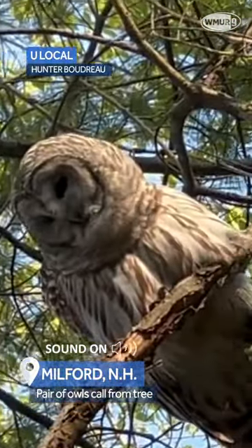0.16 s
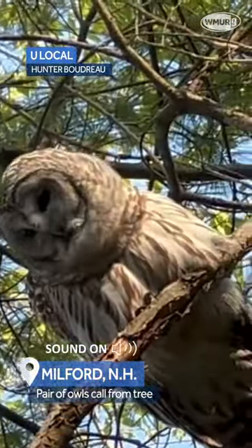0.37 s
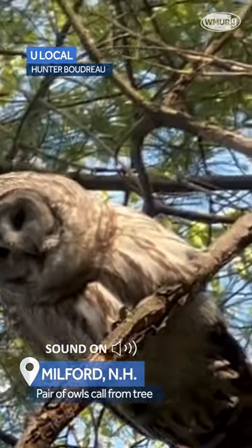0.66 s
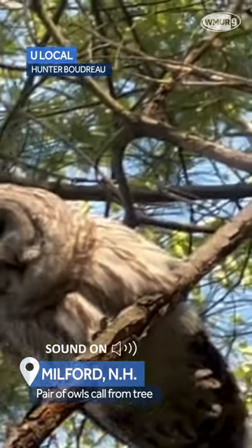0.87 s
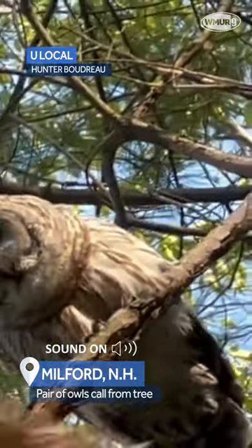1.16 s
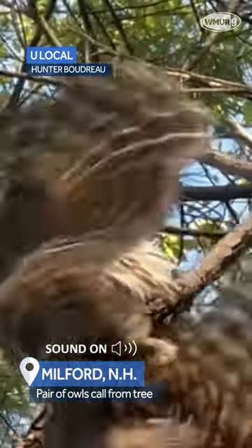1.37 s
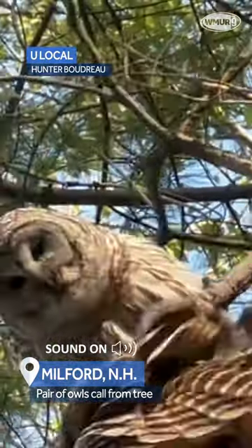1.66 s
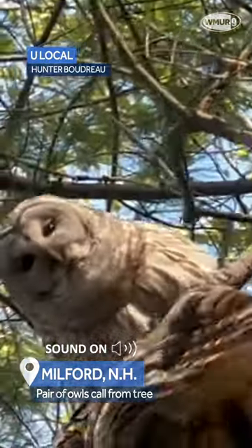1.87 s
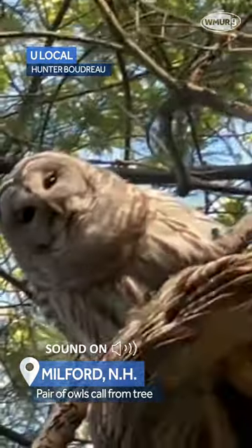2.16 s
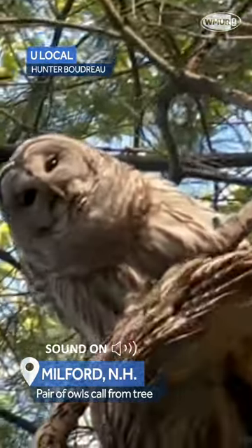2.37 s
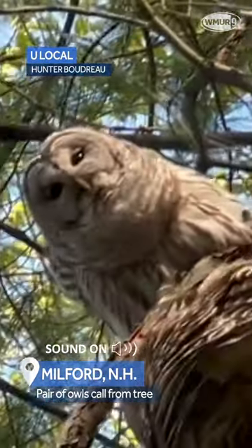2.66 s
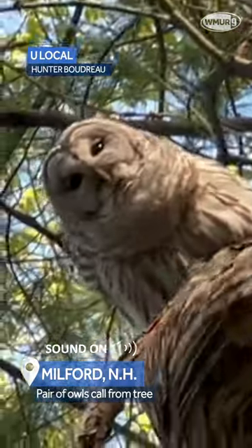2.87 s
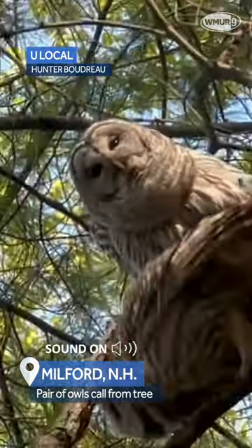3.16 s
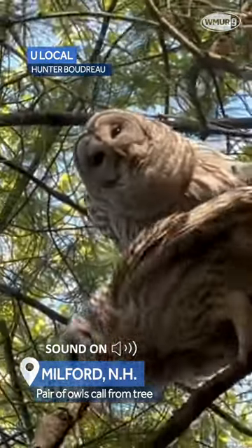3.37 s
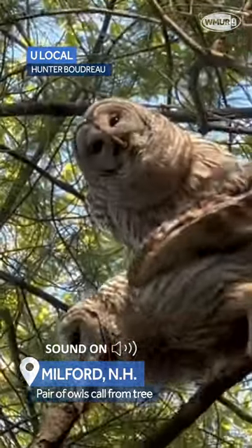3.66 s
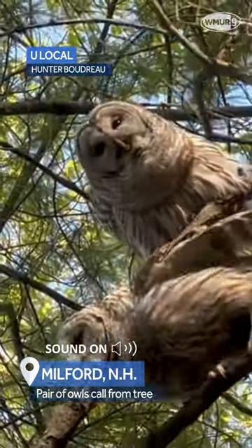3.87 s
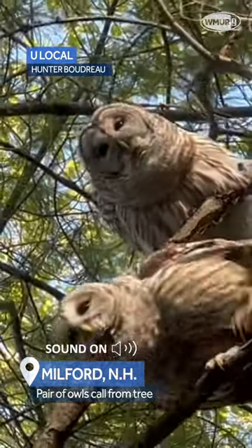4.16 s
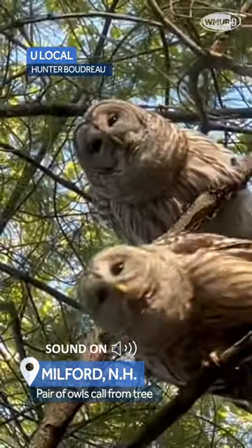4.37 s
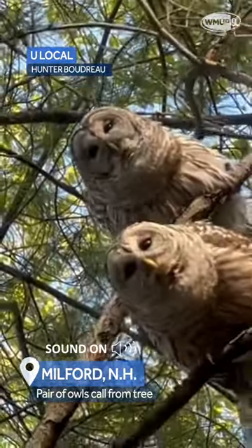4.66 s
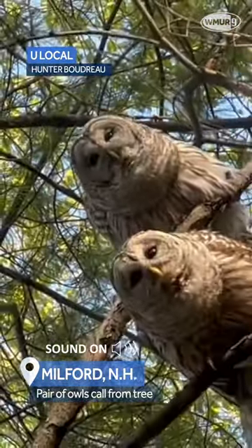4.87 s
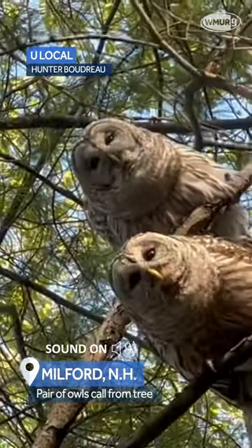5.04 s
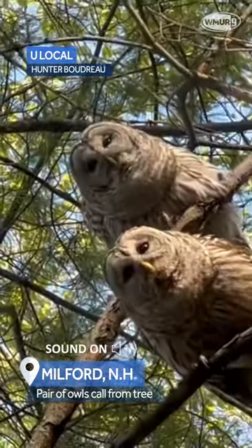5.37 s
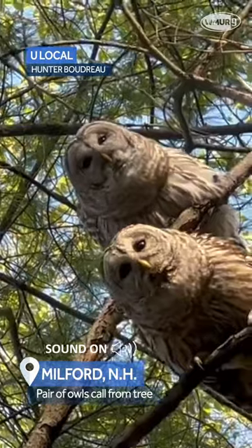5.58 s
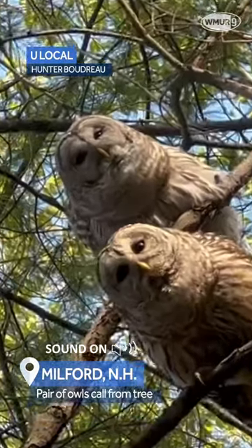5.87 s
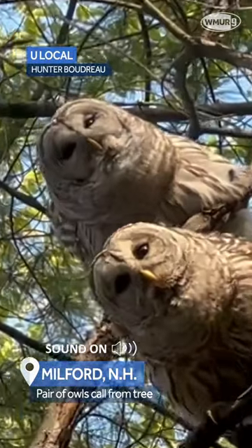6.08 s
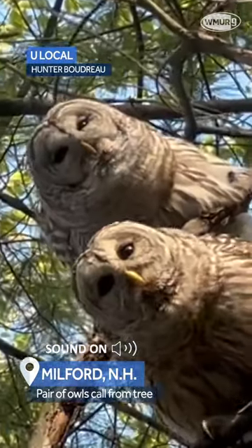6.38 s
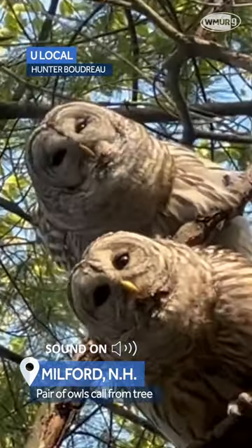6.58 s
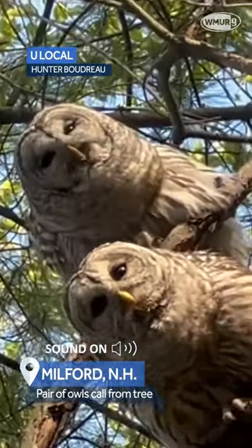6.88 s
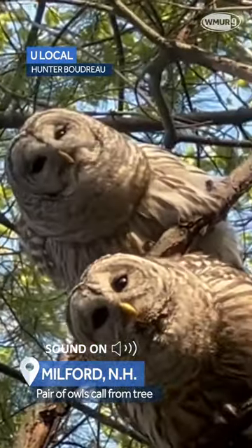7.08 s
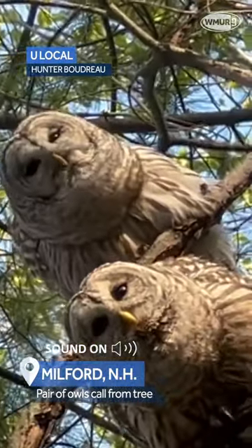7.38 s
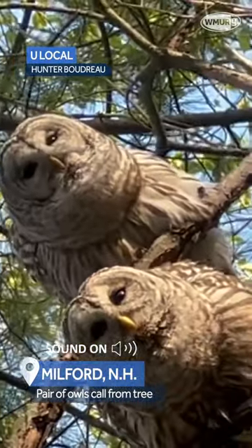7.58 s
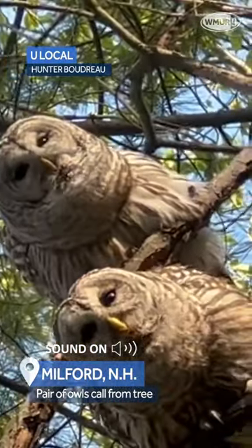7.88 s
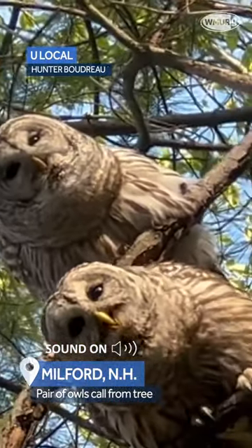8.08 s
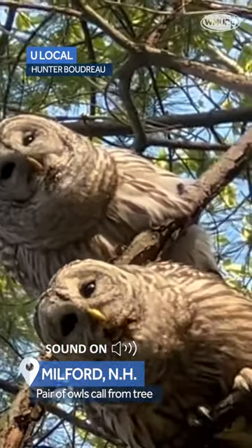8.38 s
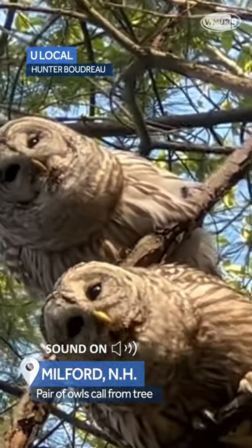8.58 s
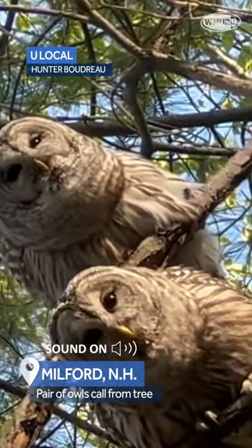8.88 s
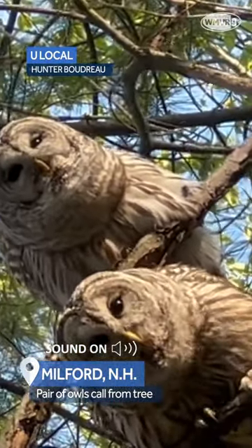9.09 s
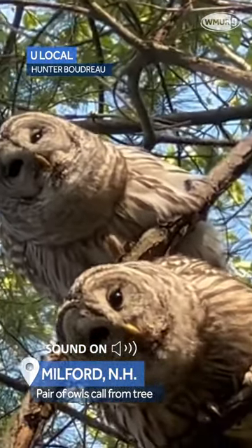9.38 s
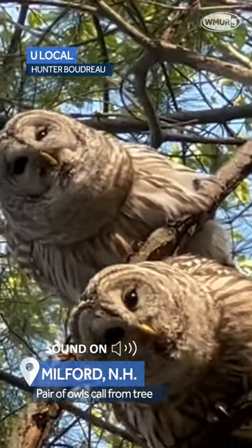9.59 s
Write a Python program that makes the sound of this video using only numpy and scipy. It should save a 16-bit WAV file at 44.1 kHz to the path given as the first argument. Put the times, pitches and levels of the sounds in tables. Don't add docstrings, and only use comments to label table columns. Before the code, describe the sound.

Two barred owls duet close by outdoors, hoarse low hoots quickening against clear higher notes, with buzzing groans and long trilled falling calls over faint traffic.

```python
import sys
import numpy as np
from scipy import signal
from scipy.fft import rfft, irfft, next_fast_len
from scipy.io import wavfile
from scipy.ndimage import uniform_filter1d

SR = 44100
rng = np.random.default_rng(int(sys.argv[2]) if len(sys.argv) > 2 else 0)


def materialize(psi):
    bounded = np.clip(np.atleast_2d(psi).T, -1, 1)
    quanta = np.round(bounded * 32767).astype(np.int16)
    wavfile.write(sys.argv[1], SR, quanta)


def gain_from_decibels(decibels):
    exponent = np.asarray(decibels, float) / 20
    return 10 ** exponent


N = 428652
TIME = np.arange(N) / SR
HZ = np.fft.rfftfreq(next_fast_len(N + SR // 2), 1 / SR)
SIZE = 2 * (len(HZ) - 1)


def shape_db(table, hz):
    f, db = np.transpose(table)
    return np.interp(np.log(hz + 1), np.log(f), db)


def level(x, db):
    return x * gain_from_decibels(db) / np.sqrt(np.mean(x ** 2))


def walk(rate, size):
    k = max(int(SR / rate), 1)
    steps = np.repeat(rng.standard_normal(size // k + 1), k)
    return 1.72 * uniform_filter1d(uniform_filter1d(steps, k), k)[:size]


def band(x, hz, octaves):
    f = np.fft.rfftfreq(len(x), 1 / SR) + 1
    bell = np.exp(-(np.log2(f / hz) / octaves) ** 2)
    return irfft(rfft(x) * bell, len(x))


def add(track, x, s):
    i = int(s * SR)
    track[i:i + len(x)] += x[:N - i]


def syrinx(hz, gain, tilt_db, even_db, jitter, breath_db, patchy_db):
    size = len(hz)
    phase = 2 * np.pi * np.cumsum(hz * (1 + jitter * walk(150, size))) / SR
    k = np.arange(1, 21)[:, None]
    tight = np.log2(hz / 250)
    db = -tilt_db * np.log2(k) - 1.63 * tight * (k > 1)
    db = db + even_db * np.clip(tight - .6, 0, 2) * (k == 2)
    effort_db = 20 * np.log10(gain / 0.19 + .001)
    db = db + 1.13 * effort_db * np.clip((k * hz - 3300) / 1800, 0, 1)
    flicker = np.array([walk(35, size) for _ in k])
    db = db + patchy_db * flicker * np.where(k > 1, 1, .25)
    tones = np.sum(gain_from_decibels(db) * (k * hz < 12000) * np.cos(k * phase), axis=0)
    air = uniform_filter1d(rng.standard_normal(size), size=14) * (1 + np.cos(phase))
    return gain * (tones + gain_from_decibels(breath_db - 6.8 * tight) * air)


def hoots(table, release_s, release_share, climb_share, edge, swell, release, tilt_db, glide_db, **voice):
    track = np.zeros(N)
    for s, length, hz, db, *thin_db in table:
        fall = release_s + release_share * length
        rise = (length - fall) * climb_share
        t = np.arange(int(length * SR)) / SR
        up = np.sin(np.pi / 2 * np.clip(t / rise, 0, 1))
        down = np.sin(np.pi / 2 * np.clip((t[-1] - t) / fall, 0, 1))
        pitch = hz * (edge + (1 - edge) * up * down)
        sag_db = sum(thin_db) * (up * down) ** 6
        gain = gain_from_decibels(db - sag_db) * up ** swell * down ** release
        dull_db = tilt_db - 0.19 * sag_db + glide_db * np.sqrt(1 - up) + glide_db / 2 * (1 - down)
        add(track, syrinx(pitch, gain, dull_db, **voice), s)
    return track


def long_calls(calls, trills, trill_depth, tilt_db, tilt_per_db, tilt_per_oct, **voice):
    track = np.zeros(N)
    for rows, (crest, rate_hz) in zip(calls, trills):
        s, *columns = np.transpose(rows)
        t = np.arange(s[0], s[-1], 1 / SR)
        hz, db = (np.interp(t, s, c) for c in columns)
        depth = trill_depth * np.clip((t - crest + 0.16) / 0.29, 0, 1)
        trill = depth * np.cos(2 * np.pi * rate_hz * (t - crest))
        since, left = t - s[0], s[-1] - t
        fade = np.clip(np.minimum(since, left) / 0.026, 0, 1)
        dull_db = tilt_db + tilt_per_db * (db + 26.5) + tilt_per_oct * np.log2(hz / 450)
        dull_db += 6 * np.clip(1 - since / .07, 0, 1) ** .5
        dull_db += 6 * np.clip(1 - left / .13, 0, 1) ** .5
        add(track, syrinx(hz * (1 + trill), fade * gain_from_decibels(db + 21 * trill), dull_db, **voice), s[0])
    return track


# start in seconds, length in seconds, top pitch in Hz, level in dB.
LOW_HOOTS = [(.02, 0.082, 180, -49), (.18, .18, 165.4, -59), (.48, .12, 208, -40.5),
             (.885, .09, 278, -31.5), (1.275, 0.1, 353.7, -28), (1.665, .12, 432.4, -31),
             (2.03, .125, 480, -28), (2.395, 0.12, 484, -25.5), (2.765, .135, 495.5, -25),
             (4.04, .09, 399.7, -32), (4.27, .08, 323, -34), (4.755, .13, 383.3, -25.5),
             (5.165, .128, 458, -24.5), (5.565, 0.12, 481.7, -25.5), (5.955, .137, 480, -22.5),
             (7.4, .123, 341, -35), (7.63, 0.16, 287.1, -31.5), (8.11, .107, 329.9, -29),
             (8.4, 0.083, 286.4, -39), (8.525, .128, 378.7, -33.5), (8.895, .135, 400, -25),
             (9.3, .126, 422.4, -27.5), (9.685, .135, 400, -29)]
# start in seconds, length in seconds, pitch factor, level in dB.
GROANS = [
    (2.954, .44, 1.01, 0),
    (6.16, .4, .985, 2.5),
]
# time as a share of its length, pitch in Hz, effort in dB.
GROAN_COURSE = [
    (0, 205.4, -15.5),
    (.07, 352.4, -31),
    (.16, 468.6, -25),
    (0.319, 474.4, -32.5),
    (0.441, 420, -27.5),
    (.56, 340.8, -27),
    (.68, 266, -36.5),
    (0.846, 201.5, -28.5),
    (0.999, 168.3, -44.5),
]


def low_owl():
    voice = hoots(LOW_HOOTS, release_s=.002, release_share=.44, climb_share=.92, edge=.34, swell=.5, release=0.36,
                  tilt_db=8, glide_db=1.5, even_db=-2, jitter=.018, breath_db=0, patchy_db=4)
    groans = [np.array(GROAN_COURSE) * (length, factor, 1) + (s, 0, db) for s, length, factor, db in GROANS]
    untrilled = [(0, 0)] * len(groans)
    return voice + long_calls(groans, untrilled, trill_depth=0, tilt_db=9.5, tilt_per_db=0.0833, tilt_per_oct=2.7,
                              even_db=11.5, jitter=0.0068, breath_db=-4.0, patchy_db=0.0)


# start in seconds, length in seconds, top pitch in Hz, level in dB,
# thinning between the forceful ends in dB.
HIGH_HOOTS = [(1.8, 0.13, 583, -65, 3), (1.89, .2, 592, -58.5, -5), (2.1, 0.077, 604, -47.5, -1),
              (3.14, 0.15, 612.5, -32.5, 0), (3.503, .14, 641.6, -28.5, 1), (3.826, .14, 665, -27, 5),
              (5.46, 0.46, 648.3, -31.5, 17), (6.025, .16, 625, -38, -0.5), (6.38, .4, 635.7, -40, -5.5),
              (8.5, .342, 635, -32.5, 10), (9.33, 0.24, 637.4, -46.5, -0.5)]
# time in seconds, pitch in Hz, effort in dB.
LONG_CALLS = [
    [(3.965, 293, -32), (4.0, 559, -30.5), (4.05, 659, -27), (4.12, 668.4, -28.5), (4.26, 592, -23),
     (4.455, 531.4, -26), (4.48, 481.3, -27), (4.73, 400, -28.5), (4.89, 320, -45)],
    [(6.85, 256, -39), (6.9, 520, -37.5), (6.96, 664, -39.5), (7.03, 663.4, -29), (7.14, 586, -27),
     (7.405, 509.3, -22.5), (7.43, 448, -27), (7.7, 402.5, -24.5), (7.9, 269.6, -39)],
]
# time of one crest in seconds, rate in Hz.
TRILLS = [
    (4.311, 21.5),
    (7.288, 16.2),
]


def high_owl():
    clear = dict(even_db=-11, jitter=.0012, patchy_db=3)
    voice = hoots(HIGH_HOOTS, release_s=.075, release_share=.08, climb_share=.66, edge=.22, swell=0.98, release=.3,
                  tilt_db=1.5, glide_db=9, breath_db=-3, **clear)
    return voice + long_calls(LONG_CALLS, TRILLS, trill_depth=.03, tilt_db=3.5, tilt_per_db=0.3438,
                              tilt_per_oct=-4.0, breath_db=-9.5, **clear)


# frequency in Hz, level in dB.
THROAT = [(150, -17.5), (700, -21.5), (1250, -28), (1900, -18), (2400, -11), (2750, -34.5), (3250, -25),
          (3900, -35.5), (4400, -56), (5300, -19.5), (6200, -37), (8000, -16.5), (8800, -60.5),
          (16000, -73.5)]
# frequency in Hz, width in Hz, level in dB, twice the left minus right difference
# in dB.
PORCH = [(358.5, 20.8, 7.5, -1.5), (400, 10, -8, -5), (480, 23.8, 8, 3), (520, 33.6, 14.5, 6.1),
         (551.9, 25.7, 19, 6), (592, 30, 9, 10.5), (669, 87, 1, 2), (874, 85, -8, 31.5), (989, 28, -2, 8)]
# delay in seconds, level in dB.
ECHOES = [(.0045, -12), (.012, -14.5), (.033, -13)]


def place(voices):
    cepstrum = irfft(np.log(gain_from_decibels(shape_db(THROAT, HZ))), SIZE)
    direct = np.exp(2 * rfft(cepstrum[:SIZE // 2], SIZE) - cepstrum[0])
    dull = 1 / (1 + (HZ / 1100) ** 4)
    echoes = 1 + dull * sum(gain_from_decibels(db) * np.exp(-2j * np.pi * HZ * s) for s, db in ECHOES)
    body = 1 / (1 + (205 / (HZ + 1)) ** 3)
    for hz in (2830, 4500):
        body *= 1 - .92 * np.exp(-((HZ - hz) / 200) ** 2)
    chest = gain_from_decibels(14.0) / (1 + ((HZ - 520) / 170) ** 2)
    t = TIME[:SR // 2]
    wood_t60_s = 0.32
    shared, apart = rng.standard_normal((2, len(t))) * gain_from_decibels(-60 * t / wood_t60_s) * (t > .006)
    spectrum = rfft(voices, SIZE) * body
    out = []
    for side in (.5, -.5):
        rings = 0
        for k, (hz, width, db, pan_db) in enumerate(PORCH):
            rings = rings + (-1) ** k * gain_from_decibels(db + .5 * side * pan_db) / (1 + 2j * (HZ - hz) / width)
        wood = gain_from_decibels(-15) * rfft((shared + .4 * side * apart) / np.linalg.norm(shared), SIZE)
        response = (direct + rings) * echoes + wood * (3.5 * direct + chest)
        out.append(irfft(spectrum * response, SIZE)[:N])
    return np.array(out)


# start in seconds, thud in dB, knock in dB, tick in dB.
KNOCKS = [
    (0.034, -46, -38, -56),
    (0.195, -39, -46, -78.5),
    (0.328, -46, -40, -76),
    (2.585, -41.5, -26, -74),
    (2.693, -42, -25.5, -77),
    (2.776, -45, -39, -55.5),
    (6.267, -46, -22.5, -84),
    (7.459, -54, -23.5, -55),
    (7.58, -56, -35, -50.5),
]


def knocks():
    track, t = np.zeros(N), TIME[:SR // 16]
    for s, thud_db, knock_db, tick_db in KNOCKS:
        tick = band(rng.standard_normal(len(t)), 5600, 0.42) * np.exp(-t / 0.0034)
        tick += 0.28 * rng.standard_normal(len(t)) * np.exp(-t / 0.00065)
        wood = np.sin(2 * np.pi * 800 * t) + 0.34 * np.sin(2 * np.pi * 1500 * t)
        wood *= np.sin(np.pi * np.clip(t / 0.0054, 0, 1)) ** 2
        thud = np.sin(2 * np.pi * 130 * t) * t / .01 * np.exp(1 - t / 0.0063)
        add(track, gain_from_decibels(tick_db + 11) * tick + gain_from_decibels(knock_db - 6) * wood + gain_from_decibels(thud_db + 6.0) * thud, s)
    return track


def wing():
    peak_s, rise_s = 1.172, 0.02
    t = np.arange(-rise_s, .16, 1 / SR)
    grain = gain_from_decibels(3.5 * walk(300, len(t)))
    centre = 8000 * 2 ** (-4.8 * t)
    gain = np.where(t < 0, (1 + t / rise_s) ** 2, gain_from_decibels(-166 * t))
    track, shared = np.zeros((2, N)), rng.standard_normal(len(t))
    for c, pan_db in enumerate((1.5, -1.5)):
        noise = (shared + 0.55 * band(rng.standard_normal(len(t)), 8100, 0.28)) * grain
        hiss = np.zeros(len(t))
        for f in np.geomspace(3500, 14000, 9):
            hiss += band(noise, f, 0.15) * np.exp(-(np.log2(f / centre) / 0.39) ** 2)
        add(track[c], level(hiss, -48.5 + pan_db) * gain, peak_s - rise_s)
    return track


# start in seconds, peak in dB, length in seconds.
RUSTLES = [
    (0.022, -43, 0.033),
    (0.391, -49.5, 0.11),
    (0.615, -55, 0.055),
    (0.905, -43, 0.049),
    (1.241, -47, 0.02),
    (1.333, -63, 0.12),
    (1.668, -47, 0.041),
    (3.388, -59, 0.043),
    (7.46, -41.5, 0.037),
]


def leaves():
    track, t = np.zeros(N), TIME[:SR // 5]
    for s, db, length in RUSTLES:
        crackle = rng.standard_normal(len(t)) * gain_from_decibels(3.3 * walk(600, len(t)))
        crackle = level(band(crackle, 2700, 1.0), db - 12.0)
        add(track, crackle * (1 - np.exp(-t / 0.0015)) * np.exp(-t / max(length, .005)), s)
    return track


# start in seconds, peak in dB, pitch in Hz.
BUMPS = [(0.197, -33, 102), (0.32, -37, 54.5), (0.758, -39.5, 61.4), (1.84, -39.5, 56.3), (2.577, -38, 121),
         (2.688, -36, 167), (3.634, -45, 144), (4.243, -40.5, 96.9), (5.174, -31.5, 129), (6.071, -43, 199),
         (6.253, -50, 116), (6.723, -41, 107), (7.008, -44, 105), (7.389, -36, 194), (7.747, -44, 202),
         (8.101, -37, 67), (8.202, -39, 198), (8.399, -33, 196), (8.625, -31, 191), (8.816, -44, 124),
         (9.33, -33.5, 134.4), (9.414, -38, 118.5)]


def bumps():
    track, t = np.zeros(N), TIME[:SR // 5]
    for s, db, hz in BUMPS:
        wobble = np.sin(2 * np.pi * np.cumsum(hz * (1 + 0.15 * walk(30, len(t)))) / SR)
        envelope = (1 - np.exp(-t / 0.0076)) * np.exp(-t * hz / 4.9)
        add(track, gain_from_decibels(db - 5) * wobble * envelope, s)
    return track


def breathing_noise(table, swell_db, flicker_db):
    noise = rfft(rng.standard_normal(SIZE)) * gain_from_decibels(shape_db(table, HZ))
    swell = walk(0.84, N)
    octave = np.log2((HZ + 1) / 30)
    total = np.zeros(N)
    for c in range(10):
        part = irfft(noise * np.clip(1 - abs(octave - c), 0, 1), SIZE)[:N]
        total += part * gain_from_decibels(swell_db * swell + flicker_db * walk(9, N))
    return total


# time in seconds, level in dB.
RUMBLE = [
    (0, -48),
    (.6, -45),
    (1.4, -50.5),
    (1.65, -59),
    (2.98, -51.5),
    (4.03, -59.5),
    (9.56, -55),
    (9.72, -67),
]
# frequency in Hz, density in dB per Hz.
RUMBLE_SPECTRUM = [(24, -30), (40, -6), (65, -2), (103, -4), (135, -6), (170, -10), (240, -13), (330, -24),
                   (480, -45), (1500, -110)]
# frequency in Hz, density in dB per Hz.
ROAD_FRONT = [(71, -31), (120, 3), (160, 2), (324, -22.5), (403, -2.5), (474, -5), (644, -7), (680, -9),
              (924, -3.5), (1210, -10.5), (1620, -6), (2280, -22.5), (5730, -27), (9000, -29),
              (11700, -101), (19800, -120)]
# frequency in Hz, density in dB per Hz.
ROAD_WIDE = [(35, -47.5), (60, -9), (129, -7.5), (264, -13.5), (1160, -7), (1610, 7), (2440, -16.5),
             (7590, -92), (9240, -24.5), (11000, -64), (14300, -74.5), (22000, -120)]


def road():
    s, db = np.transpose(RUMBLE)
    rumble = level(breathing_noise(RUMBLE_SPECTRUM, swell_db=0.5, flicker_db=1.5), 0)
    rumble *= gain_from_decibels(np.interp(TIME, s, db))
    late = gain_from_decibels(-25) * np.roll(rumble, SR // 10)
    front = level(breathing_noise(ROAD_FRONT, swell_db=.4, flicker_db=.8), -56)
    wide = level(breathing_noise(ROAD_WIDE, swell_db=.4, flicker_db=.8), -54.5)
    left = rumble + late + front + 1.3 * wide
    right = rumble - late + front - .7 * wide
    return np.array([left, right])


# frequency in Hz, width in Hz, level in dB.
HUM = [
    (118.5, 4.6, -63.5),
    (102, 10, -70.5),
]


def engines():
    noise = rfft(rng.standard_normal(SIZE))
    hum = np.zeros(N)
    for hz, width, db in HUM:
        hum += level(irfft(noise / (1 + (2 * (HZ - hz) / width) ** 2), SIZE)[:N], db)
    hiss = irfft(rfft(rng.standard_normal(SIZE)) * (HZ < 16100), SIZE)[:N]
    return hum + level(hiss, -77)


def scene():
    owls = place(low_owl() + high_owl())
    return owls + knocks() + wing() + leaves() + bumps() + road() + engines()


def roll_off(x):
    return signal.sosfilt(signal.butter(12, 16340, fs=SR, output="sos"), x)


def record(dry):
    mix = dry * np.clip((TIME[-1] - TIME) / 0.007, 0, 1)
    return roll_off(mix)


dry = scene()
out = record(dry)
materialize(out)
```